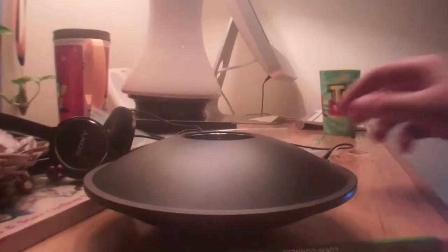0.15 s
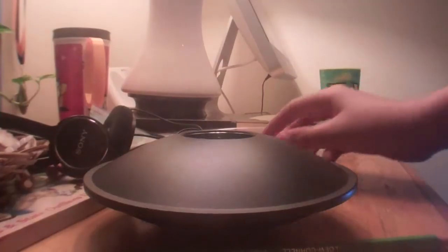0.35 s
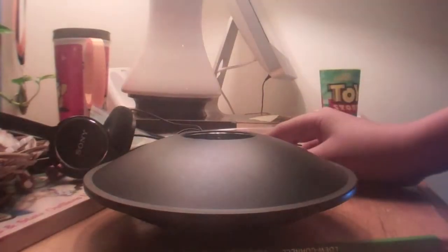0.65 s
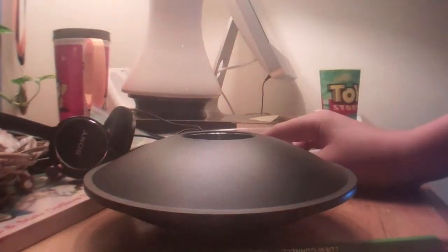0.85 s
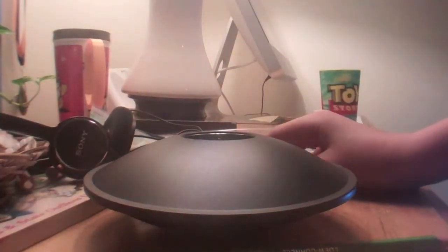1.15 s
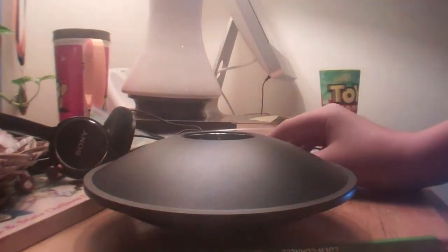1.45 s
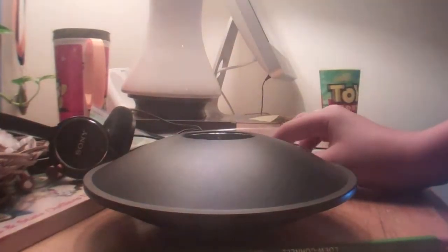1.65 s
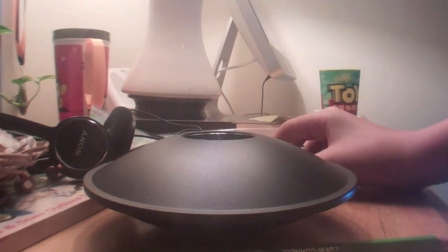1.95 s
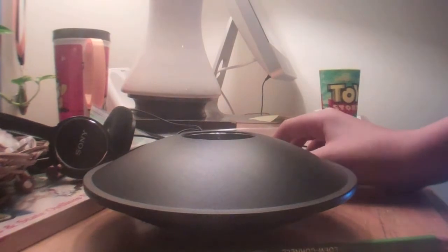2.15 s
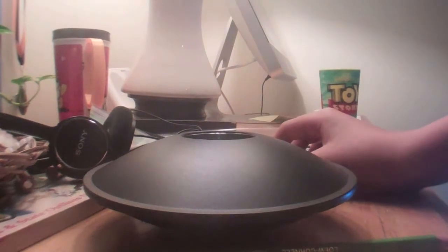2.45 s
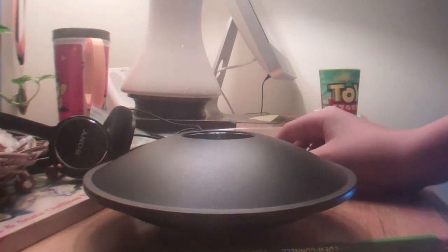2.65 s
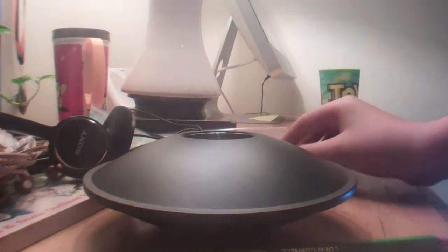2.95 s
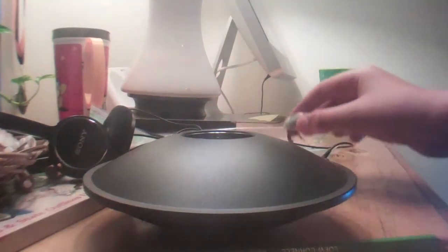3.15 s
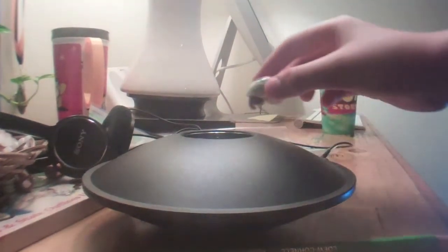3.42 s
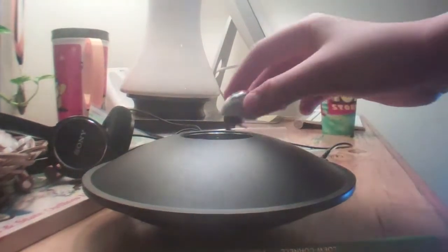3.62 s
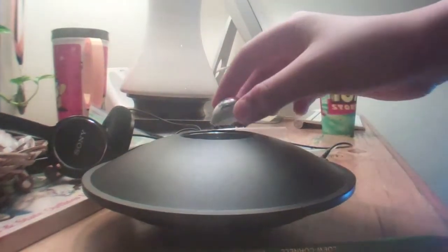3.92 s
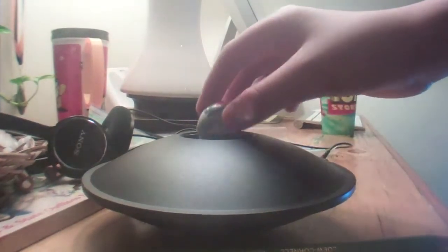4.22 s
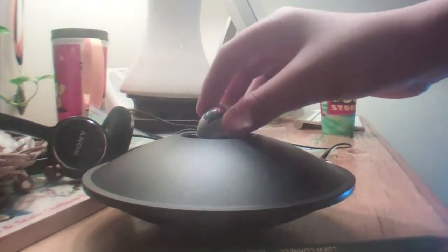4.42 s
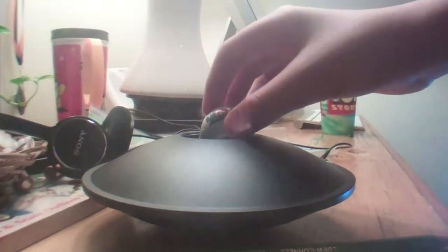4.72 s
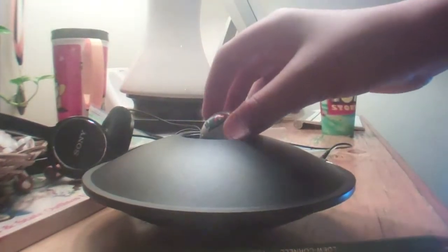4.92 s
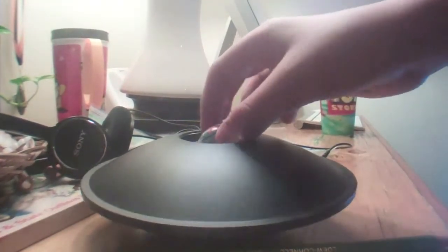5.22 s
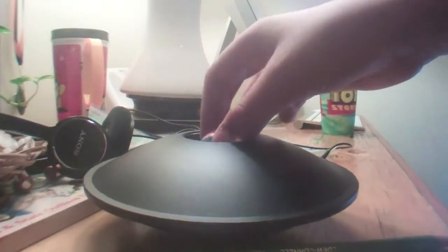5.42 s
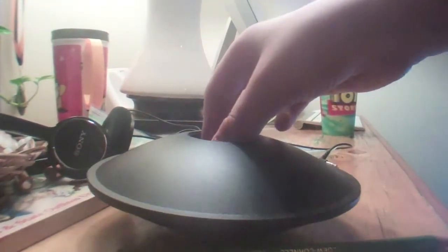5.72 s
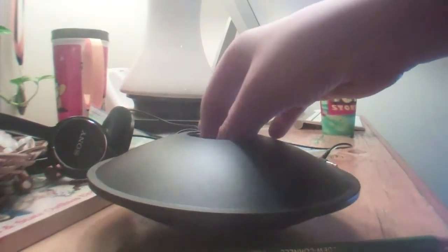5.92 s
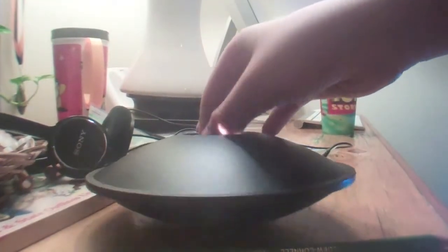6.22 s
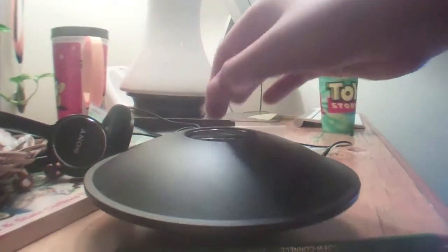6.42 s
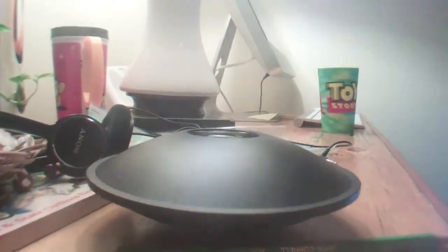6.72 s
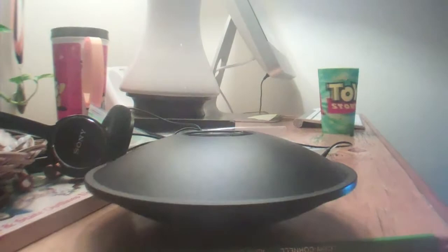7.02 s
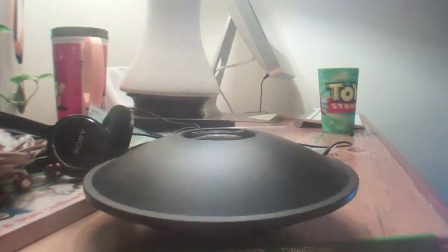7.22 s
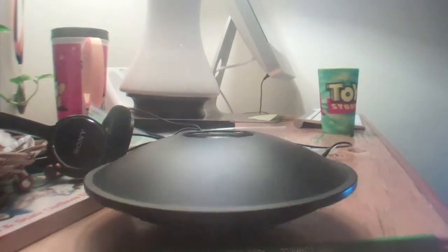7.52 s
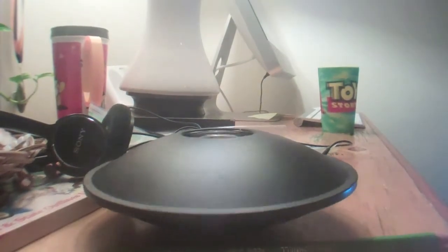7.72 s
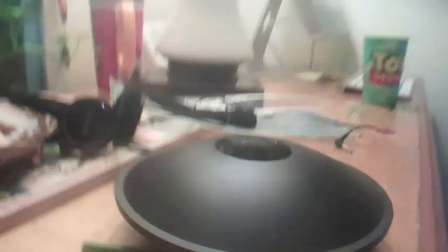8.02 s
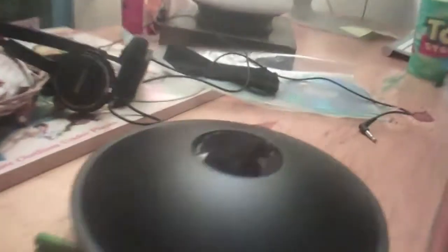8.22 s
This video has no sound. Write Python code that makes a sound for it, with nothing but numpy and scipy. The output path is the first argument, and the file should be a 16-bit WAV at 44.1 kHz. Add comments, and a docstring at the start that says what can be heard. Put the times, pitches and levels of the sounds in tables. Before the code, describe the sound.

A low hum and microphone hiss fill a small, quiet room throughout. At about 0.5 seconds a hermit crab's shell knocks twice on a wooden desk, close by, and faint, uneven taps of shell and legs follow until 2.7 seconds. Around 3.7 seconds the shell grates briefly on the rim of a hollow plastic bowl. It bumps the rim at 4.3 and 4.4 seconds with a slight ring, and light scratches and softer bumps continue until 5.6 seconds. At 5.9 seconds the crab drops in with a sharp clack, the loudest sound. It tumbles and patters hollowly against the plastic, busiest around 6.4 seconds. Near 7 seconds the bowl rocks to rest in quickening, fading knocks, then tips once against the desk. Soft shuffles and faint leg taps follow until 8 seconds, and short, crackly handling rustles close the sound at about 8.3 seconds.

```python
"""A wooden desk in a small, quiet room, with a low hum and microphone hiss.
A hand picks up a hermit crab, whose shell knocks on the desk, and lowers it through the hole of a
hollow plastic bowl. Shell and legs scrape and bump the rim, making the shell ring. The crab drops in
with a sharp clack, then tumbles and patters while the bowl rocks and tips once against the desk.
Things rustle close by as they are handled, mostly at the end."""
import sys
import numpy as np
from scipy import signal
from scipy.fft import rfft, irfft
from scipy.io import wavfile

SR = 44100
rng = np.random.default_rng(int(sys.argv[2]) if len(sys.argv) > 2 else 0)


def generate_wav(sig):
    """Save sig (samples, or channels by samples) to the path in sys.argv[1] as 16-bit PCM at SR."""
    pcm = np.round(np.clip(np.atleast_2d(sig).T, -1, 1) * 32767).astype(np.int16)
    wavfile.write(sys.argv[1], SR, pcm)


N = 368676


def amp(db):
    """Turns decibels into a gain."""
    return 10 ** (np.asarray(db) / 20)


def rms(x):
    """The average size of a signal (root mean square)."""
    return np.sqrt(np.mean(x ** 2, axis=-1, keepdims=True) + 1e-20)


def curve(points, hz):
    """Joins rows of (Hz, value) with lines on a logarithmic frequency scale."""
    f, value = np.transpose(points)
    return np.interp(np.log(hz + 1), np.log(f + 1), value)


def either_way(count):
    """Random values between minus one and one."""
    return 2 * rng.random(count) - 1


def add(mix, s, sound):
    """Lays a stereo sound into the mix at s seconds."""
    part = mix[:, max(round(s * SR), 0):][:, :sound.shape[1]]
    part += sound[:, :part.shape[1]]


# The low, middle and high range of every contact. Each row: bottom in Hz, top in Hz (capped at 21 kHz),
# how alike left and right are from 0 to 1, left minus right in dB.
RANGES = [(198, 1133, 0.98, -0.3), (1345, 5950, 0.88, 1.5), (4200, 46000, 0, 2)]

def ringing(modes, steepness=0.92):
    """How an object with these resonances rings after one tiny tap, in each range."""
    hz = abs(np.fft.fftfreq(4096, 1 / SR))
    gain = sum(amp(db) / (1 + ((hz ** 2 - f ** 2) / (width * hz + 1)) ** 2) ** steepness
               for f, width, db in modes)
    spectrum = np.exp(np.conj(signal.hilbert(np.log(gain + 1e-5))))  # no ringing before the tap
    ring = np.fft.ifft(spectrum).real
    bands = [signal.butter(4, [lo, min(hi, SR / 2.1)], "bandpass", fs=SR, output="sos")
             for lo, hi, _, _ in RANGES]
    return [signal.sosfilt(band, ring) for band in bands]


def radiate(forces, rings, levels_db, length_s):
    """Forces ring the object in stereo; each range's level is set over the first length_s."""
    out = 0
    for (shared, other), ring, db, (_, _, alike, lean_db) in zip(forces, rings, levels_db, RANGES):
        side = np.sqrt((1 - alike) / 2) * other
        pair = signal.fftconvolve([shared + side, shared - side], ring[None], axes=1)
        pair /= rms(pair[:, :round(length_s * SR)])
        out = out + pair * amp([[db + lean_db / 2], [db - lean_db / 2]])
    return out


def rub(strokes, modes, slips_per_s, spread_db, hiss, corner_hz, brightening, trim_db):
    """Rubbing is many tiny, uneven slips over a smooth hiss; more treble means sharper slips."""
    out, rings = np.zeros((2, N)), ringing(modes)
    slips = (rng.random(N) < slips_per_s / SR) * amp(spread_db * np.minimum(rng.exponential(1, N), 3))
    friction = (slips + hiss) * rng.standard_normal((2, N))
    for s, length, *levels_db in strokes:  # low, middle and high levels
        force = friction[:, round(s * SR):round((s + length) * SR)]
        force = force * signal.windows.tukey(force.shape[1], .4)
        top_hz = np.clip(corner_hz * amp(brightening * (levels_db[-1] + 55)), 1000, SR / 2.2)
        force = signal.lfilter(*signal.butter(2, top_hz, fs=SR), force)
        add(out, s, radiate([force] * len(RANGES), rings, np.add(levels_db, trim_db), length))
    return out


def shape_strokes(rows, body_db, thinning):
    """A brighter stroke has more treble and, if thinning is positive, less bass."""
    return [(s, length, db + body_db - thinning * bright, db, db + bright)
            for s, length, db, bright in rows]


def shape_blows(rows, flex_s, shortening, overtone, tick_db, tick_growth):
    """A harder blow is shorter, with more clack and high tick over its low thud."""
    detune = 1 + 0.055 * either_way(len(rows))
    return [(s, hz, flex_s * amp(-shortening * hard), overtone * hz * d,
             db, db + hard, db + tick_db + tick_growth * hard)
            for (s, db, hard, hz), d in zip(rows, detune)]


def strike(blows, modes, steepness, damping, shove, ping, ping_s, crack_s, chatter, snap, crispness,
           spot_db, trim_db):
    """A blow shoves and bends a surface, pings the spot it hits, and cracks with a little chatter."""
    out, t = np.zeros((2, N)), np.arange(1500) / SR
    for s, thud_hz, flex_s, clack_hz, *levels_db in blows:
        noise = rng.standard_normal((5, len(t)))
        lifts = spot_db * either_way(len(modes))  # each spot favours other resonances
        rings = ringing([(f, width, db + lift) for (f, width, db), lift in zip(modes, lifts)], steepness)
        age = t / max(flex_s, .0005)
        swell = age ** 0.74 * np.exp(-damping * age)
        flex = swell / swell.max() * np.sin(2 * np.pi * thud_hz * t)
        thud = flex + shove * (t / 0.00025) * np.exp(1 - t / 0.00031)
        crack_fade = np.exp(-t / crack_s) + chatter * np.exp(-t / 0.0025)
        crack = noise[1:] * (1 - np.exp(-t / 0.00099)) * crack_fade
        contact = snap * np.exp(-t / .00004)
        clack = contact + crack[0] + ping * np.exp(-t / ping_s) * np.sin(2 * np.pi * clack_hz * t)
        clack = signal.lfilter([1, -crispness], [1], clack)  # a stiff surface brightens the clack
        tick = contact + crack[2]
        forces = [(thud, noise[0] * abs(thud)), (clack, crack[1]), (tick, crack[3])]
        add(out, s, radiate(forces, rings, np.add(levels_db, trim_db), length_s=0.018))
    return out


# Room tone and hiss. Each row: frequency in Hz, relative level in dB.
AIR_COLOUR = [(25, -79.5), (70, -73), (105, -60.5), (200, -58.5), (310, -59), (390, -64.5), (500, -61.5),
              (700, -71.5), (1000, -71.5), (1300, -80), (2000, -83), (7500, -87.5), (10000, -86.5),
              (14000, -84)]
# Fan-like hum and thin electronic whine. Each row: pitch in Hz, width in Hz, boost in dB.
HUM = [(118.9, 9.2, 7), (178, 9.1, 10), (272.6, 8.3, 11), (2504, 9.4, 13.5), (7850, 31, 8.5),
       (11810, 20, 8)]
# Stereo width. Each row: frequency in Hz, how alike left and right are from 0 to 1.
AIR_LIKENESS = [(60, 0.97), (150, 0.98), (380, 0.97), (950, 0.78), (2380, 0), (5980, 0), (15000, -0.0)]
# Stereo balance. Each row: frequency in Hz, left minus right in dB.
AIR_BALANCE = [(60, 1), (240, 0.5), (950, -1), (3770, 0.5), (15000, 0.5)]

def room_tone():
    """Steady noise shaped into a low rumble, narrow bands of hum and microphone hiss."""
    hz = np.fft.rfftfreq(N, 1 / SR)
    left, other = rfft(rng.standard_normal((2, N)))
    alike = curve(AIR_LIKENESS, hz)
    right = alike * left + np.sqrt(1 - alike ** 2) * other
    hum_db = sum(lift / (1 + (2 * (hz - f) / width) ** 2) for f, width, lift in HUM)
    db = curve(AIR_COLOUR, hz) + hum_db
    lean_db = curve(AIR_BALANCE, hz) / 2
    pair = irfft(np.array([left, right]) * amp([db + lean_db, db - lean_db]), N)
    return pair / rms(pair).mean() * amp(-43.5)


# A dip in the background. Each row: time in seconds, level change in dB.
AIR_DIP = [(5.9, 0.5), (6.12, -8.5), (6.37, 0)]
# Each entry: the start of a near silence in the background, in seconds.
DROPOUTS_S = [0.096, 8.064]

def background_gain(silent_s=0.026, fade_out_s=0.075, fade_in_s=0.099):
    """The background dips after the loudest clack, and twice drops out for a moment."""
    t = np.arange(N) / SR
    gain = amp(np.interp(t, *np.transpose(AIR_DIP)))
    for s in DROPOUTS_S:
        away = np.maximum((s - t) / fade_out_s, (t - s - silent_s) / fade_in_s)
        gain *= np.interp(away, [0, .05, 1], amp([-43, -14.5, 0]))
    return gain


# The tone of the rustling. Each row: pitch in Hz, width in Hz, relative level in dB.
RUSTLE_MODES = [(784, 88, 26), (1170, 310, -4.5), (2310, 330, 4), (2880, 320, 10), (3920, 640, 0.5),
                (5400, 980, -11), (8500, 850, -7.5), (13300, 11000, -1)]
# Each row: start in seconds, length in seconds, relative level in dB, brightness in dB.
RUSTLES = [(0.43, 0.013, -51, 9.5), (2.48, 0.024, -52.5, 4.5), (8.105, 0.03, -50.5, -6),
           (8.158, 0.047, -42.5, -3.5), (8.187, 0.079, -42.5, -11), (8.318, 0.039, -49, 2)]

def handling_rustles():
    """Things being handled slip in short, crackly strokes."""
    strokes = shape_strokes(RUSTLES, body_db=-6.5, thinning=-.15)
    return rub(strokes, RUSTLE_MODES, slips_per_s=330, spread_db=1.3, hiss=0.058,
               corner_hz=15000, brightening=.2, trim_db=[-1.5, -1, -1])


def leg_patter(start_s, end_s, mean_db, hardness_db, pitch_hz, count):
    """Rows for faint leg taps at uneven moments, each with its own strength and pitch."""
    when, size, spot = rng.random((count, 3)).T
    times = start_s + (end_s - start_s) * (np.arange(count) + when) / count
    levels = mean_db + 2.5 * (2 * size - 1)
    pitches = pitch_hz * 2 ** (0.19 * (2 * spot - 1))
    return [(s, db, hardness_db, hz) for s, db, hz in zip(times, levels, pitches)]


# How the desk top rings. Each row: pitch in Hz, width in Hz, relative level in dB.
DESK_MODES = [(321, 200, 2), (417, 210, -2.5), (690, 140, 2.5), (998, 125, 8.5), (1172, 72, 8.5),
              (1570, 240, -3), (2090, 260, -12), (2700, 180, -10), (3180, 210, -22), (4820, 240, -32.5),
              (8200, 2200, -35.5), (12700, 2700, -43)]
# Each row: start in seconds, relative level in dB, hardness (clack over thud) in dB, thud pitch in Hz.
DESK_KNOCKS = [(0.4725, -23, -18.5, 840), (0.5175, -37, -10, 466), (0.549, -19, -4.5, 930),
               (1.052, -39, -13.5, 770), (1.061, -42, -29, 490), (1.117, -40.5, -22, 460),
               (1.135, -43.5, -11, 660), (1.2485, -37, -9, 725), (1.293, -42.5, -9.5, 810),
               (1.6855, -30.5, -13, 950), (1.7675, -32.5, -20.5, 657), (1.9306, -37, -12, 610),
               (1.947, -40.5, -11, 900), (2.0388, -43, -16, 810), (7.254, -36, -7, 860)]

def desk_knocks():
    """The crab's shell and legs knock on the wooden desk; later the bowl tips against it once."""
    rows = DESK_KNOCKS + leg_patter(1.5, 2.72, mean_db=-43.5, hardness_db=-18, pitch_hz=640, count=5)
    blows = shape_blows(rows, flex_s=0.0018, shortening=0.097, overtone=1.915,
                        tick_db=-23.5, tick_growth=0.35)
    return strike(blows, DESK_MODES, steepness=0.95, damping=5.1, shove=0.17, ping=.13, ping_s=0.00081,
                  crack_s=0.0016, chatter=0.18, snap=2, crispness=0.84,
                  spot_db=3.5, trim_db=[-1.5, 0, -1])


# How the crab's hollow shell rings. Each row: pitch in Hz, width in Hz, relative level in dB.
SHELL_MODES = [(605, 81, 11.5), (777, 270, 3.5), (1118, 98, 2), (1450, 57, -14), (1910, 68, -6),
               (2120, 130, 3.5), (2475, 62, 11), (2690, 79, 0.5), (3060, 260, -3), (3656, 100, -4.5),
               (4040, 56, -7), (4800, 300, -22), (5700, 130, -18), (6020, 120, -1.5), (6500, 300, -19),
               (7140, 370, -14), (8000, 300, -17), (9550, 460, -6), (10560, 420, -17), (11700, 300, -17),
               (12500, 150, -5), (13100, 300, -27), (14050, 680, -2)]
# Each row: start in seconds, length in seconds, relative level in dB, brightness in dB.
SCRAPES = [(3.637, 0.006, -42, 15.5), (3.647, 0.016, -44.5, 12.5), (3.682, 0.049, -45.5, -7),
           (3.729, 0.041, -31, -9.5), (3.766, 0.02, -36, -15.5), (4.951, 0.0041, -64, 16)]

def shell_scrapes():
    """The shell grates on the rim, and the quick slips make it ring."""
    strokes = shape_strokes(SCRAPES, body_db=-10.5, thinning=0.6)
    return rub(strokes, SHELL_MODES, slips_per_s=1300, spread_db=3.0, hiss=0.3,
               corner_hz=8600, brightening=0.25, trim_db=[-1.5, -.5, -.5])


# Each row: start in seconds, length in seconds, relative level in dB.
SCRATCHES = [(3.78, 0.068, -57.5), (4.257, 0.022, -49), (4.617, 0.035, -54.5), (4.699, 0.02, -53.5),
             (4.747, 0.12, -57), (4.97, 0.067, -51.5), (5.053, 0.07, -55.5), (5.195, 0.025, -59.5),
             (5.553, 0.019, -56)]

def leg_scratches(body_db=10.5, treble_db=-1.5):
    """Legs scratch lightly at the rim, all with the same dull tone."""
    strokes = [(s, length, db + body_db, db, db + treble_db) for s, length, db in SCRATCHES]
    return rub(strokes, SHELL_MODES, slips_per_s=450, spread_db=2.5, hiss=0.07,
               corner_hz=7000, brightening=.25, trim_db=[-1.5, -.5, -.5])


# Each row: start in seconds, relative level in dB, hardness in dB, thud pitch in Hz.
RIM_BUMPS = [(4.269, -25.5, -18.5, 615), (4.4265, -23, -22, 685), (4.694, -35, -47, 630),
             (4.989, -36.5, -16, 630)]

def rim_bumps():
    """The held shell bumps the rim and rings."""
    blows = shape_blows(RIM_BUMPS, flex_s=0.0014, shortening=.28, overtone=3.1,
                        tick_db=-11, tick_growth=1.3)
    return strike(blows, SHELL_MODES, steepness=0.86, damping=4.6, shove=0.65, ping=0.069, ping_s=0.0025,
                  crack_s=0.011, chatter=0.58, snap=2.1, crispness=.1,
                  spot_db=1.5, trim_db=[-.5, -1, -1])


# How the bowl and the air in it ring. Each row: pitch in Hz, width in Hz, relative level in dB.
BOWL_MODES = [(276, 150, -11), (516, 91, 2.5), (632, 48, 5), (744, 790, -11), (767, 31, 5),
              (808, 21, -12.5), (1064, 380, 6.5), (1506, 42, 3), (1870, 60, -32.5), (2360, 200, -1.5),
              (2850, 330, -3.5), (3064, 77, -18.5), (3640, 43, -2), (4010, 490, -17.5), (4400, 720, -25),
              (5330, 260, -27), (5860, 320, -15), (6970, 320, -24.5), (7860, 260, -32), (8500, 1100, -16.5),
              (9920, 490, -31.5), (10500, 270, -23), (11500, 350, -19.5), (12450, 300, -44),
              (14200, 1800, -18.5)]
# Each row: start in seconds, relative level in dB, hardness in dB, thud pitch in Hz.
BOWL_TAPS = [(5.929, -12, -3.5, 745), (5.9515, -33, -18, 825), (6.0585, -37, -13, 690),
             (6.0745, -26, -8, 740), (6.134, -40.5, -8, 740), (6.151, -32, -18, 730),
             (6.1725, -32, -20, 760), (6.2365, -33.5, -16, 800), (6.3255, -26.5, -18, 660),
             (6.3585, -34, -13.5, 740), (6.37, -26, -20, 620), (6.397, -19.5, -10.5, 744),
             (6.4102, -20.5, -12.5, 790), (6.4135, -16.5, -45, 744), (6.4195, -29, -6, 860),
             (6.432, -27.5, -18, 750), (6.446, -25.5, -17, 727), (6.511, -38.5, -7.5, 746),
             (6.549, -26, -26, 740), (6.6375, -25.5, -13, 745), (6.7095, -31, -19.5, 716),
             (6.8095, -25.5, -14, 710), (6.848, -26, -19.5, 746), (6.8955, -26, -26, 726),
             (6.924, -38.5, -8.5, 760), (6.9375, -25.5, -22.5, 707), (7.4996, -41.5, -20, 760),
             (7.5585, -39, -11, 640), (7.606, -66, 1.5, 990), (7.819, -47, -11.5, 1110)]

def bowl_tumble():
    """The shell drops in and tumbles against the plastic, the bowl rocks, and legs patter."""
    rows = BOWL_TAPS + rocking(start_s=6.9665, first_db=-31.5, hardness_db=-22.5, pitch_hz=750, count=8)
    rows += leg_patter(7.65, 8.0, mean_db=-44.5, hardness_db=-31, pitch_hz=725, count=3)
    blows = shape_blows(rows, flex_s=0.0022, shortening=0.32, overtone=3.05,
                        tick_db=3.5, tick_growth=2.75)
    return strike(blows, BOWL_MODES, steepness=0.99, damping=3.52, shove=0.84, ping=0.073, ping_s=0.0031,
                  crack_s=0.00088, chatter=0.16, snap=0.91, crispness=0.73,
                  spot_db=5.0, trim_db=[0, -1, -1])


def rocking(start_s, first_db, hardness_db, pitch_hz, count, gap_s=.0325, gap_ratio=.89, loss_db=0.97):
    """Rows for the bowl rocking to rest: slightly uneven knocks that come sooner and weaker."""
    k = np.arange(count)
    size, spot = either_way((count, 2)).T
    times = start_s + np.r_[0, np.cumsum(gap_s * gap_ratio ** k[:-1])]
    levels = first_db - loss_db * k - 0.5 * size
    pitches = pitch_hz * (1 + 0.06 * spot)
    return [(s, db, hardness_db, hz) for s, db, hz in zip(times, levels, pitches)]


# Each row: start in seconds, length in seconds, relative level in dB, brightness in dB.
SHUFFLES = [(7.405, 0.052, -56.5, 2), (7.51, 0.112, -58, 2)]

def crab_shuffles():
    """The crab shuffles about, softly rubbing the inside of the bowl."""
    strokes = shape_strokes(SHUFFLES, body_db=9, thinning=.3)
    return rub(strokes, BOWL_MODES, slips_per_s=1200, spread_db=5.0, hiss=0.14,
               corner_hz=5500, brightening=.15, trim_db=[-1.5, -1.5, -1.5])


# First echoes from desk, lamp and wall. Each row: delay in seconds, gain.
ECHOES = [(.0046, 0.19), (.0069, 0.075), (.0103, 0.18), (.0128, 0.11), (.0165, .1), (.0232, 0.013)]
# How the room dies away. Each row: frequency in Hz, seconds to fade by 60 dB.
ROOM_DECAY = [(200, 0.19), (700, 0.21), (1500, 0.25), (4000, 0.19), (12000, 0.18)]

def room_echo(x, tail_db, likeness):
    """Adds a few near echoes and a short wash of sound, most alike left and right in the bass."""
    count = SR // 3
    early = np.zeros((2, count))
    early[:, 0] = 1
    for delay, gain in ECHOES:
        early[:, round(delay * SR)] += gain
    hz, t, noise = signal.stft(rng.standard_normal((2, count)), SR, nperseg=256)
    alike = (likeness / (1 + (hz / 2200) ** 2))[:, None]
    noise[1] = alike * noise[0] + np.sqrt(1 - alike ** 2) * noise[1]
    fade = amp(-60 * t / curve(ROOM_DECAY, hz)[:, None])
    tail = signal.istft(noise * fade, SR, nperseg=256)[1][:, :count]
    tail *= np.minimum(np.arange(count) / SR / 0.0032, 1) ** 2
    return signal.fftconvolve(x, early + amp(tail_db) * tail / np.linalg.norm(tail[0]), axes=1)[:, :N]


def scene():
    """Handling, desk, rim and bowl sounds in the room, over the background."""
    background = room_tone() * background_gain()
    rustles = handling_rustles()
    desk = room_echo(desk_knocks(), tail_db=-6.5, likeness=0.71)
    rim = shell_scrapes() + leg_scratches() + rim_bumps()
    bowl = bowl_tumble() + crab_shuffles()
    return background + desk + room_echo(rustles + rim + bowl, tail_db=-9.0, likeness=1.0)


def record(dry):
    """Flattens any peak that overloads the input, then cuts the highest treble."""
    limited = np.clip(dry, -.92, .92)
    lowpass = signal.firwin(801, 14330, window=("kaiser", 8), fs=SR)
    return signal.oaconvolve(limited, lowpass[None], "same", axes=1)


dry = scene()
out = record(dry)
generate_wav(out)
```